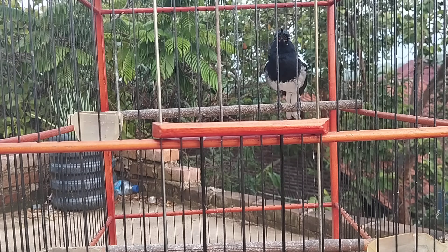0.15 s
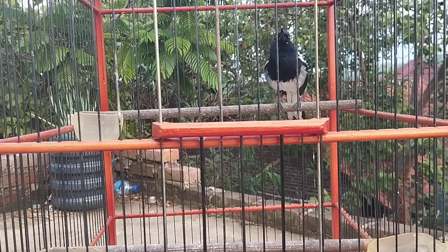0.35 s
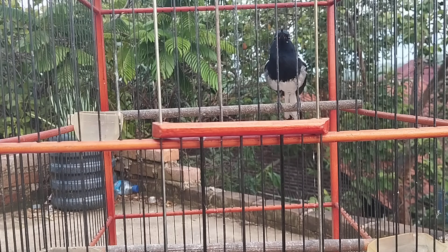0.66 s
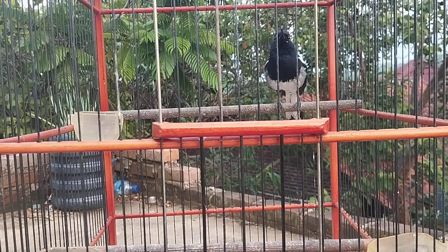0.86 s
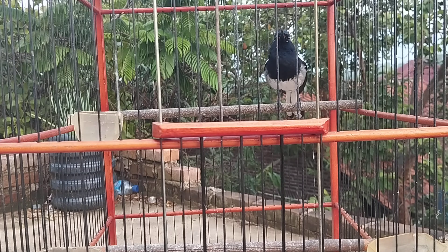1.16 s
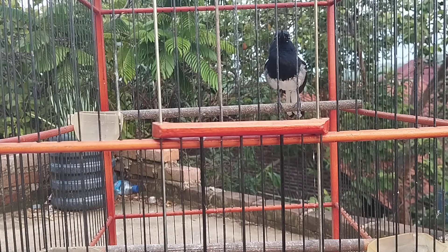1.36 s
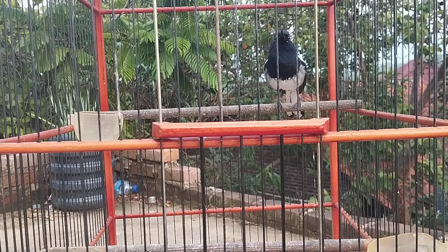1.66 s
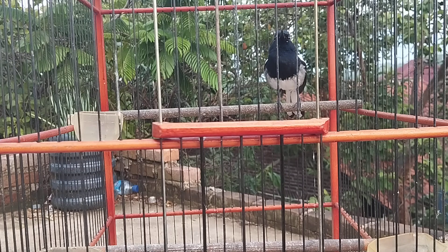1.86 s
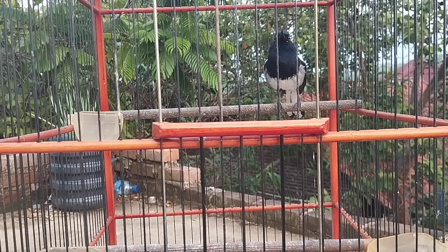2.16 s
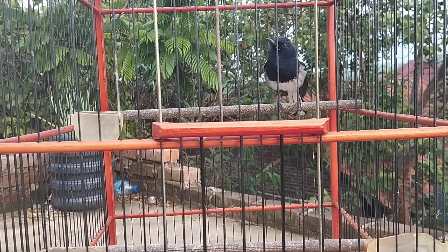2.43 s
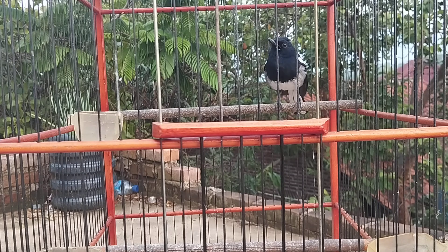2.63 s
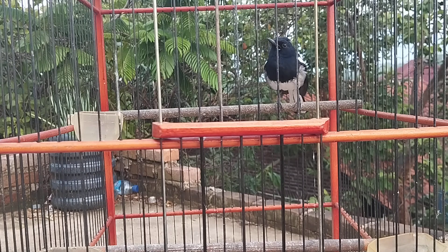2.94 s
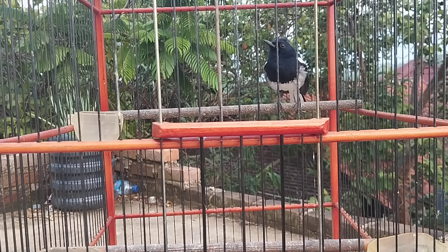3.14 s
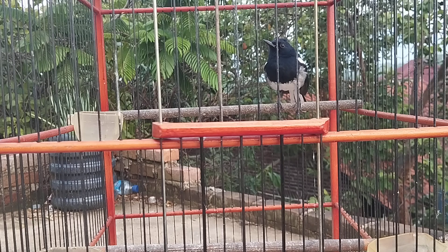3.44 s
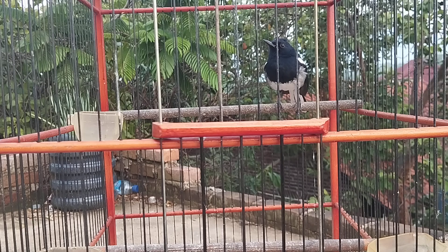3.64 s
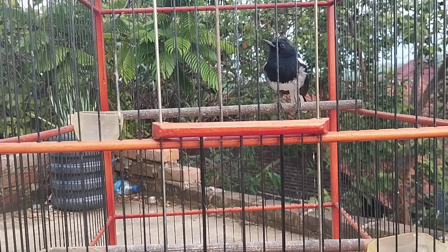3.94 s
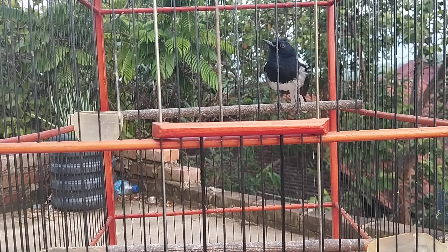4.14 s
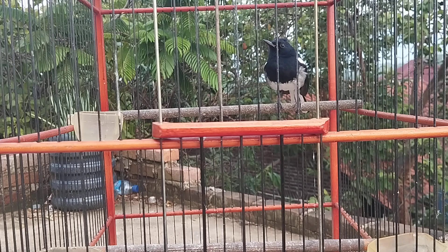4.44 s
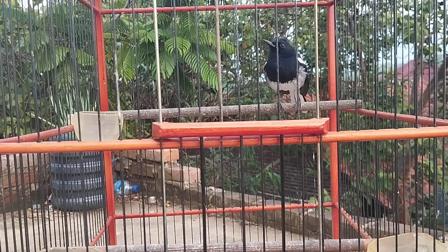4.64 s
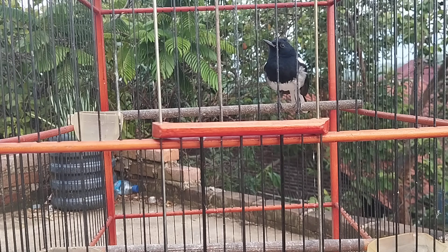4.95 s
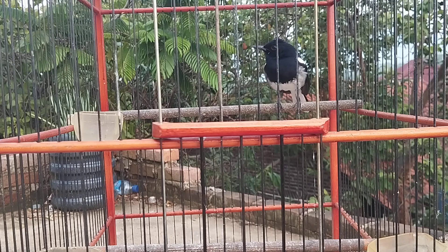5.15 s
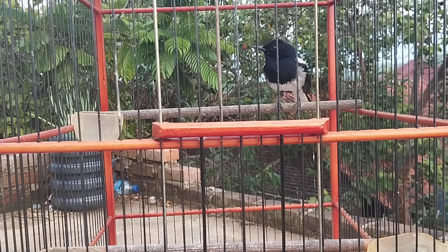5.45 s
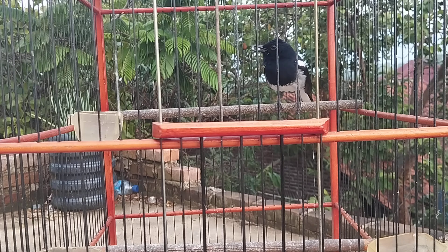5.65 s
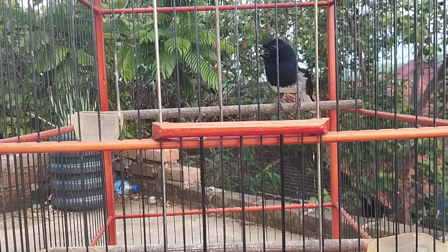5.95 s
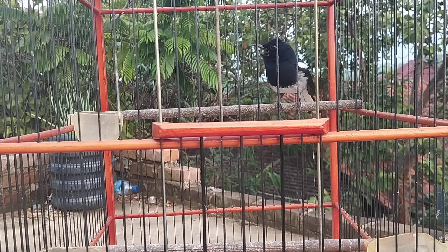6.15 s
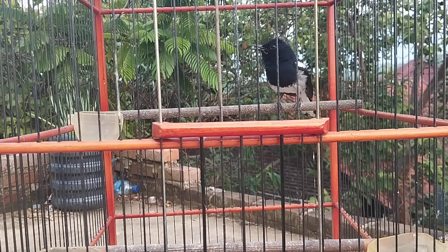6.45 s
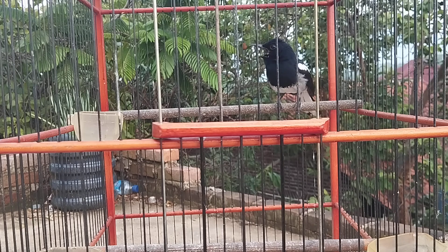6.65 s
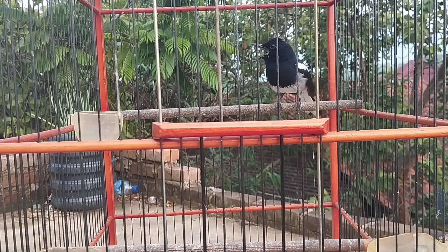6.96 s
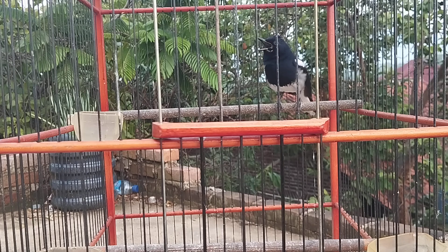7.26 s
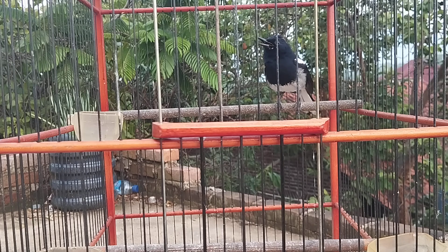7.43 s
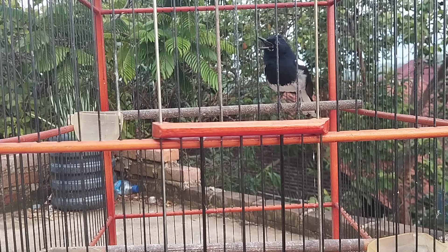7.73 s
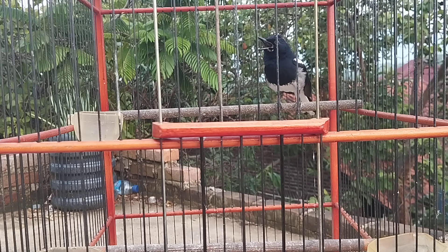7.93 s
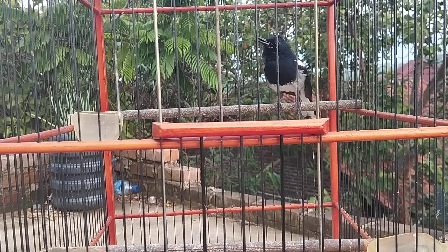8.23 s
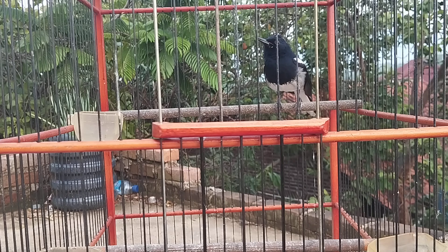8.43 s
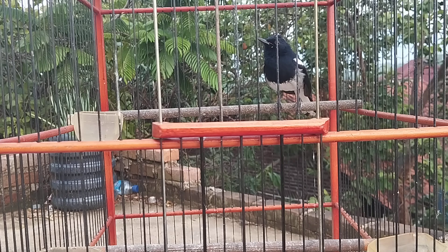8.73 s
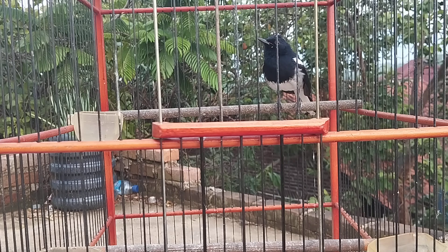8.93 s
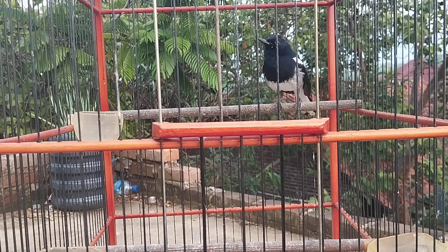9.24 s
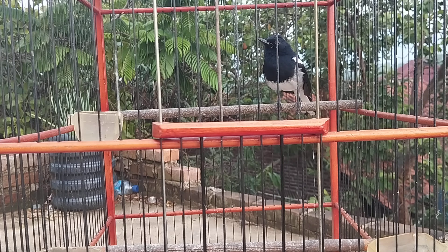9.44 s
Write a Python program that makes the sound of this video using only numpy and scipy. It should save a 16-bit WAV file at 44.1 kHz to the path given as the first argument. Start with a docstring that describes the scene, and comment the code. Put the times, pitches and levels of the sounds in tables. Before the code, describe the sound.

A caged songbird sings close to a stereo microphone in a yard, opening with quick, loud whistles, a trill and a buzzy note. It pauses for several seconds, leaving faint chirps from other birds, a few small ticks and low traffic rumble. Then it sings a longer phrase of sliding notes and clear whistles, again ending in a trill and buzz. Faint insects and a very distant siren lie underneath.

```python
"""Caged songbird in a yard

Two bouts of whistles, trills, slurs and two-voiced buzzes from the membranes of the syrinx, close to
a stereo microphone. Nearby walls throw quick echoes. Behind: other birds, small ticks, insects,
traffic rumble, an idling engine and a very distant two-tone siren."""
import sys
import numpy as np
from scipy import signal
from scipy.io import wavfile
from scipy.ndimage import uniform_filter1d, minimum_filter1d

SR = 44100
rng = np.random.default_rng(int(sys.argv[2]) if len(sys.argv) > 2 else 0)


def dump_mix(stems):
    """Bounce the given channels to the path in sys.argv[1] as a 16-bit WAV at rate SR."""
    frames = np.atleast_2d(stems).T  # one column per channel
    limited = np.clip(frames, -1, 1)  # hard clip at full scale
    pcm = np.round(limited * 32767).astype(np.int16)
    wavfile.write(sys.argv[1], SR, pcm)


N = 422919

# rumble and hiss: (frequency [Hz], relative density [dB])
AIR_SPECTRUM = [(15, -33), (25, -7), (55, 2), (100, -9), (190, -2.5), (300, -9.5), (520, -20), (800, -21.5),
                (1000, -27.5), (2000, -30), (4500, -30), (8300, -38), (9300, -67.5), (16000, -64.5)]
# (frequency [Hz], left-right correlation [-1..1])
AIR_CORRELATION = [(60, 0.97), (180, 0.87), (550, -0.54), (1650, 0.13), (4970, 0.97), (15000, 0.73)]
# (time [s], relative level [dB])
TRAFFIC_SWELL = [(0, -58.5), (2.1, -53.5), (5.301, -54), (7.1, -57), (7.9, -54.5), (8.499, -51),
                 (9.59, -52)]
# (centre [Hz], spread [Hz], level [dB])
INSECT_BANDS = [(2382, 130, -65.5), (7350, 500, -77)]
# (time [s], firing rate [Hz], gain [dB])
ENGINE_CURVE = [(3, 36.2, -65.5), (7.6, 37.7, -58.5), (9.59, 38.4, -57)]
# low and high tone: (pitch [Hz], initial level [dB], first onset [s])
SIREN_TONES = [(582, -65, .58), (762, -69, -.1)]
# short taps and ticks; the first is a faint puff of background hiss:
# (time [s], initial level [dB], resonance [Hz], bandwidth [Hz])
TICKS = [(.154, -50, 4200, 3000), (0.7, -45, 700, 870), (1.262, -48.5, 4470, 3970),
         (1.872, -47, 4500, 4010), (1.978, -37.5, 980, 1190), (1.98, -64, 4000, 3920),
         (2.508, -52, 4000, 4000), (3.837, -53, 5920, 2980), (5.216, -55.5, 6460, 3056)]

# far songbirds: (time [s], length [s], first [Hz], middle [Hz], last [Hz], level [dB])
FAR_CALLS = [(1.22, .11, 1763, 1827, 1835, -48.5), (1.373, 0.14, 1343, 1390, 1460, -49.5),
             (1.602, .13, 1663, 1762, 1876, -49), (1.759, 0.11, 1235, 1372, 1345, -48.5),
             (1.974, 0.098, 3035, 2881, 2940, -43.5), (2.056, 0.083, 2990, 2317, 1980, -45),
             (2.201, .14, 1200, 1338, 1387, -50.5), (2.4, 0.082, 1128, 1694, 1730, -49.5),
             (2.5, 0.091, 1190, 1684, 1840, -49), (2.602, 0.21, 1804, 2195, 2516, -46),
             (2.917, .036, 2280, 1510, 1080, -48), (2.97, .11, 1732, 1765, 1861, -47.5),
             (3.298, 0.05, 4657, 4680, 4654, -66), (1.017, 0.17, 4020, 3896, 3900, -59.5),
             (4.235, 0.088, 2570, 3940, 5050, -56.5), (4.31, 0.11, 4570, 6300, 6880, -54.5),
             (3.835, 0.042, 2910, 3400, 4080, -55), (8.51, 0.06, 4100, 3990, 3680, -70),
             (5.692, .15, 1403, 1385, 1380, -69.5), (9.214, .15, 1060, 1102, 1058, -71.5)]
# small near bird: columns as FAR_CALLS
NEAR_CALLS = [(2.815, 0.034, 4400, 3634, 4300, -66), (2.865, .035, 4600, 3900, 4500, -60),
              (5.48, .18, 5100, 4490, 3750, -71), (9.175, 0.16, 4780, 4284, 3450, -58.5)]
# steeply falling chirps: (time [s], length [s], first pitch [Hz], level [dB])
CHIRPS = [(3.39, .05, 4300, -64), (3.471, 0.045, 4290, -59), (3.619, 0.044, 4390, -54),
          (3.757, 0.052, 4200, -55), (3.865, 0.058, 4900, -51.5), (4.026, 0.053, 4200, -53.5),
          (4.531, 0.045, 4430, -54), (4.707, 0.043, 4320, -51.5), (4.877, .048, 4390, -55.5),
          (8.818, 0.035, 5800, -56), (8.984, .026, 6300, -55), (9.377, 0.024, 5500, -53)]
# one far whistle, repeated: (time [s], length [s], level [dB])
FALLS = [(.097, .11, -52), (.32, .17, -49), (.587, .19, -50.5)]
FALL_HZ = (5880, 4270, 3870)  # first, middle, last

# plain notes: (time [s], length [s], peak [dB], peak position [0..1], sag [dB], entry [Hz],
# after attack [Hz], at peak [Hz], before release [Hz], exit [Hz], roughness [0..1],
# brightness [dB], left minus right [dB])
WHISTLES = [(-.1, 0.16, -2.5, 0.95, 0.5, 3230, 3258, 3390, 3355, 3250, 0.4, -19.5, -2.5),
            (0.195, 0.14, -2.5, 0.26, 6.6, 3607, 3240, 3219, 3149, 3180, 0.26, -5, 6.5),
            (5.998, 0.13, -7, 0.42, 0.33, 3470, 3687, 3734, 3672, 3786, 0.17, 5.5, -0.5),
            (6.996, 0.11, -8.5, .5, 3.3, 4740, 4574, 4499, 4562, 4805, 0.38, -6.5, -3),
            (7.236, 0.15, 0, .55, 0.46, 3380, 3134, 3378, 3392, 3260, 0.4, -7.5, 1),
            (7.532, 0.14, 2, 0.79, 8.7, 3470, 3222, 3201, 3135, 3167, 0.22, -6.5, 1.5)]
# (time [s], length [s], level [dB], opening [Hz], first [Hz], last [Hz], left minus right [dB])
TRILLS = [(0.434, 0.2913, -9, 3191, 3038, 2822, 2.5), (7.77, 0.3215, -10, 3178, 3044, 2827, 0.5)]
# brief pitch lifts in the trills: (time [s], lift [Hz])
WARBLES = [(0.48, 49.5), (0.508, 44.4), (0.524, 71), (0.55, 91), (0.58, 108), (.606, 110.6), (0.633, 125),
           (.655, 130), (0.699, 75.7), (7.823, 59.4), (7.841, 39.8), (7.865, 71), (7.885, 70), (7.912, 103),
           (7.935, 88.3), (7.964, 171.5), (7.979, 70), (8.012, 173), (8.068, 116)]
# (time [s], gain [dB], left minus right [dB])
BUZZES = [(.848, -14.5, -0.5), (8.196, -14.5, -0.3)]
# (offset [s], relative level [dB], pitch [Hz], second voice gap [Hz], its strength, roughness [0..1])
BUZZ_CONTOUR = [(0, -12.5, 2081, 212, 0, 0), (0.03, 1.5, 2164, 213, 0.015, .1),
                (.04, 1.5, 2133, 212.3, 0.13, 0.4), (.1, 1, 2128, 201, 0.12, 0.2),
                (.15, 1.5, 2152, 319.3, 0.36, 0.35), (.19, -2.5, 2220, 320, 1.3, .3),
                (.226, -0.5, 2219, 366.5, 1.5, 0.2), (.242, -5, 2137, 354, 0.23, 0.3)]
# one list per slurred note: (time [s], level [dB], pitch [Hz], roughness [0..1])
SLUR_CONTOURS = [
    [(5.716, -43.5, 2310, 0.05), (5.742, -14.5, 2624, 0.19), (5.774, -6.5, 2662, 0.16),
     (5.81, -9.5, 2670, 0.04), (5.834, -5.5, 2607, 0), (5.866, -4.5, 2735, 0.08), (5.886, -14, 2620, 0.3)],
    [(6.243, -22, 3950, 0.08), (6.27, -4, 3897, 0.13), (6.31, -11.5, 3547, 0.8), (6.34, -6.5, 3310, 0.53),
     (6.365, -7.5, 3170, 1), (6.39, -10.5, 2724, 0.46), (6.415, -11, 2647, .69), (6.45, -17.5, 2310, 0.2),
     (6.51, -12, 2164, 0.2), (6.545, -12, 2215, 0.1), (6.565, -15.5, 2490, 0.1)],
    [(6.69, -47.5, 3210, 1), (6.711, -35.5, 3460, 0.98), (6.716, -15.5, 3550, .8), (6.74, -13, 3850, 0.91),
     (6.77, -6.5, 4030, 0.73), (6.795, -16, 3934, 0.14), (6.83, -9.5, 4162, 0), (6.87, -2, 4188, 0.1),
     (6.882, -19, 4310, .07)],
]
# second voice per slur, before scaling by roughness: (gap [Hz], strength, left minus right [dB])
SLUR_VOICES = [(400, 0, 2), (450.5, 0.038, 0.4), (-720, .55, 2)]
# grace notes: (time [s], length [s], first [Hz], last [Hz], final level [dB])
GRACES = [(.175, 0.031, 4900, 5290, -25.5), (7.204, 0.041, 3700, 5360, -29),
          (7.517, .025, 4900, 5220, -30.5), (8.188, .015, 4690, 4850, -43)]
# partials 4 to 7: (level re fundamental before each timbre's offset is added [dB])
UPPER_PARTIALS_DB = [-47, -51, -53.5, -44]
# cage floor and walls: (delay [s], left [dB], right [dB])
ECHOES = [(.004, -19, -15), (.0051, -14.5, -14), (.0061, -25, -15), (.0079, -17, -21), (.0094, -13, -18),
          (0.011, -14, -18), (0.013, -15.5, -9.5), (0.015, -12.5, -10), (0.017, -20, -20.5)]
# songbird's tone colour: throat low cut, microphone dips and peak in the treble:
# (frequency [Hz], gain [dB])
SONG_COLOUR = [(700, -24), (1700, -4.5), (2050, -2.5), (4000, 3), (9000, 1.5), (10000, -22), (12000, -2),
               (13400, -23), (14600, -1.5), (15500, 7.5)]

# timbres: (partial 2 [dB], partial 3 [dB], offset on partials 4 to 7 [dB])
WHISTLE_TONE_DB, TRILL_TONE_DB = (-31, -39.5, -5.5), (-17, -39.5, 6.4)
BUZZ_TONE_DB, SLUR_TONE_DB, GRACE_TONE_DB = (-24, -31, .3), (-28, -35.5, -3.5), (-41, -57, -11.5)
ATTACK_S, RELEASE_S = .011, .012
ONSET_DB, RELEASE_DB = -24, -13  # start re peak; change over a whistle's release


def amp(db):
    return 10 ** (np.asarray(db) / 20)


def unit_rms(x):
    return x / np.sqrt(np.mean(x ** 2) + 1e-20)


def log_interp(points, hz):
    """Spectrum value, linear over log frequency."""
    f, value = np.transpose(points)
    return np.interp(np.log(hz + 1), np.log(f + 1), value)


def add(mix, start_s, sound):
    """Mix in place from start_s."""
    part = mix[..., max(round(start_s * SR), 0):][..., :sound.shape[-1]]
    part += sound[..., :part.shape[-1]]


def wander(samples, cutoff_hz):
    """Low-passed noise, rms 1."""
    lowpass = signal.butter(N=2, Wn=cutoff_hz, fs=SR)
    return unit_rms(signal.lfilter(*lowpass, rng.standard_normal(samples + 2000))[2000:])


def reverb_tail(t60_s, onset_s):
    """Sparse decaying reflections, independent per channel, energy 1."""
    t = np.arange(SR) / SR
    taps = rng.choice([-1., 1.], (2, SR)) * (rng.random((2, SR)) < 3000 / SR)
    taps = taps * amp(-60 * t / t60_s) * (t > onset_s)
    return taps / np.linalg.norm(taps, axis=1, keepdims=True)


def noise_spectra():
    """Bin frequencies and short-time spectra of patchy, partly correlated stereo noise."""
    frames, hz = N // 256 + 5, np.fft.rfftfreq(1024, 1 / SR)
    a, b, c, d, patches = rng.standard_normal((frames, 513, 5)).T
    patches = unit_rms(uniform_filter1d(uniform_filter1d(patches, 10, axis=0), 14, axis=1))
    correlation = np.clip(log_interp(AIR_CORRELATION, hz), -1, 1)[:, None]
    left = a + 1j * b
    right = correlation * left + np.sqrt(1 - correlation ** 2) * (c + 1j * d)
    return hz, np.array([left, right]) * amp(1.3 * patches)


def waveform(spectra):
    """Inverse STFT, rms 1."""
    return unit_rms(signal.istft(spectra, nperseg=1024, noverlap=768)[1][:, :N])


def air(hz, noise, level_db=-49.5):
    """Rumble and hiss; traffic swells the band around 500 Hz."""
    s, db = np.transpose(TRAFFIC_SWELL)
    swell_db = np.interp(np.arange(noise.shape[-1]) * 256 / SR, s, db - db.min())
    band = np.exp(-np.log((hz + 1) / 500) ** 2 / .9)[:, None]
    shape_db = log_interp(AIR_SPECTRUM, hz)[:, None] + band * swell_db
    return amp(level_db) * waveform(noise * amp(shape_db))


def insects(hz, noise):
    """Steady chorus: narrow bands of noise."""
    return sum(amp(db) * waveform(noise * np.exp(-((hz - centre_hz) / spread_hz) ** 2 / 2)[:, None])
               for centre_hz, spread_hz, db in INSECT_BANDS)


def engine():
    """Firing orders of a distant idling motor, each wavering by itself."""
    s, hz, db = np.transpose(ENGINE_CURVE)
    t = np.arange(N) / SR
    cycles = np.cumsum(np.interp(t, s, hz)) / SR
    sway = uniform_filter1d(rng.standard_normal((22, N // 512 + 1)), size=30, axis=1)
    sway = np.repeat(sway, 512, axis=1)[:, :N]
    sway = uniform_filter1d(unit_rms(sway), size=512, axis=1)
    orders = sum(amp(-1.9 * abs(k - 8) + 2.5 * sway[k]) * np.sin(2 * np.pi * k * cycles + k * k)
                 for k in range(3, 22))
    return orders * amp(np.interp(t, s, db))


def siren(period_s=1.358):
    """Two alternating tones, fading with the wind; the high one dies out with distance."""
    t, out = np.arange(N) / SR, 0
    for (hz, db, onset_s), loss_db_per_s in zip(SIREN_TONES, (.1, 1.6)):
        gate = uniform_filter1d(1. * ((t - onset_s) % period_s < period_s / 2), 1500)
        gain = amp(db - loss_db_per_s * t + 2.6 * wander(N, 4.4))
        out = out + np.sqrt(2) * gain * gate * np.sin(2 * np.pi * hz * t)
    return out * amp([[-1.5], [1.5]])


def ticks(t60_s=.089):
    """A faint puff of hiss, then short taps and ticks: noise bursts in one broad resonance each."""
    out, t = np.zeros((2, N)), np.arange(1200) / SR
    for s, db, hz, width_hz in TICKS:
        resonance = signal.iirpeak(hz, hz / width_hz, SR)
        burst = unit_rms(signal.lfilter(*resonance, rng.standard_normal((2, len(t)))))
        add(out, s, amp(db) * burst * amp(-60 * t / t60_s))
    return signal.sosfilt(signal.butter(N=6, Wn=8800, fs=SR, output="sos"), out)


def glides(calls):
    """Bird whistles: sines gliding through three pitches; quick high sweeps are hoarse."""
    dry = np.zeros(N)
    for s, length_s, *hz, db in calls:
        u = np.arange(0, 1, 1 / (SR * length_s))
        high = max(hz) > 3500
        hoarse = high and length_s < .085 and np.ptp(hz) > 750
        pitch_hz = np.polyval(np.polyfit([0, .5, 1], hz, deg=2), u)
        pitch_hz *= 1 + .005 * wander(len(u), 50) + .03 * hoarse * wander(len(u), 200)
        db = db + 4 * high * wander(len(u), 45)  # leaves and air break up high calls
        tone = np.sqrt(2) * np.sin(2 * np.pi * np.cumsum(pitch_hz) / SR)
        add(dry, s, amp(db) * tone * signal.windows.tukey(len(u), .6))
    return dry


def other_birds():
    """Far, chirping and near birds, direct and echoed by trees and houses."""
    falls = [(s, length_s, *FALL_HZ, db) for s, length_s, db in FALLS]
    chirps = [(s, length_s, hz, .75 * hz, .54 * hz, db) for s, length_s, hz, db in CHIRPS]
    dry = np.array([glides(FAR_CALLS + falls), glides(chirps), glides(NEAR_CALLS)])
    direct = amp([-4.5, -6.5, .1]) @ dry
    echoed = amp([3.6, 1.5, -3]) @ dry
    tail = reverb_tail(t60_s=.48, onset_s=.0051)
    return direct + signal.fftconvolve(echoed[None], tail, axes=1)[:, :N]


def syrinx(contour, tone_db, pan_db, warbles=()):
    """A vibrating membrane with weak overtones; a second one pulls on it and adds sidebands."""
    # columns as BUZZ_CONTOUR; missing ones are zero
    s, *columns = np.transpose([tuple(row) + (0,) * (6 - len(row)) for row in contour])
    t = np.arange(s[0], s[-1], 1 / SR)
    db, hz, gap_hz, strength, rough = (np.interp(t, s, c) for c in columns)
    hz = uniform_filter1d(hz, 150, mode="nearest")
    hz += sum(lift_hz * np.exp(-((t - at_s) / width_s) ** 2) for at_s, lift_hz, width_s in warbles)
    hz += 8 * wander(len(t), 90) + 260 * rough ** 3 * wander(len(t), 110)
    gap_hz *= 1 + (.04 + .16 * rough ** 2) * wander(len(t), 80)
    carrier = np.exp(2j * np.pi * np.cumsum(hz) / SR)
    beat = np.exp(2j * np.pi * np.cumsum(gap_hz) / SR)
    # uneven pull within each beat: sideband ladder for a higher second voice, lost in rough notes
    ladder_gain = np.clip(1 - .95 * rough, 0, 1) * (gap_hz > 0)
    ladders = [ladder_gain * sum(ratio ** n * beat ** n * np.exp(-.12j * n * n) for n in range(2, 11))
               for ratio in (.55, .75)]
    leak = wander(len(t), 1100) * (.025 + .05 * rough)  # air between the two voices
    flutter = .5 * rough ** 2 * wander(len(t), 100)
    pull, overtone_pull = (strength * (beat + (ladder + .044 / beat + leak) / (.13 + strength)) + flutter
                           for ladder in ladders)
    second_db, third_db, upper_db = tone_db
    out = carrier * (1 + pull)
    for k, part_db in enumerate([second_db, third_db] + [upper_db + u for u in UPPER_PARTIALS_DB], 2):
        partial = carrier ** k * (1 + .66 * k * overtone_pull) / (1 + .7 * strength ** 2)
        out += amp(part_db) * partial * (k * hz < SR / 2.2)
    edge = np.clip(np.minimum(t - s[0], s[-1] - t) / .0025, 0, 1)
    envelope = np.sqrt(2) * amp(db) * np.sin(edge * np.pi / 2) ** 2
    return envelope * out.real * amp([[pan_db / 2], [-pan_db / 2]])


def grace(s, length_s, first_hz, last_hz, db, start_db=-22.5):
    """Thin rising note that swells into the next."""
    contour = [(s, db + start_db, first_hz),
               (s + .5 * length_s, db + .68 * start_db, .32 * first_hz + .68 * last_hz),
               (s + length_s, db, last_hz)]
    return contour, GRACE_TONE_DB, 0


def slur(points, gap_hz, strength, pan_db):
    """Sliding note; any second voice grows with hoarseness."""
    contour = [(s, db, hz, gap_hz * (.39 + .65 * rough), strength * rough ** 3, rough)
               for s, db, hz, rough in points]
    return contour, SLUR_TONE_DB, pan_db


def buzz(s, gain_db, pan_db):
    """Both sides of the syrinx sound and beat."""
    contour = [(s + offset_s, gain_db + db, *rest) for offset_s, db, *rest in BUZZ_CONTOUR]
    return contour, BUZZ_TONE_DB, pan_db


def trill(s, length_s, db, opening_hz, first_hz, last_hz, pan_db, opening_s=.022, step_s=.008, sag_db=5):
    """A plain opening steps down to a sinking note with lengthening warbles."""
    contour = [(s, db + ONSET_DB, first_hz),
               (s + 1.6 * ATTACK_S, db, opening_hz),
               (s + opening_s, db, opening_hz),
               (s + opening_s + step_s, db, first_hz),
               (s + .5 * length_s, db - .27 * sag_db, .67 * first_hz + .33 * last_hz),
               (s + length_s - RELEASE_S, db - sag_db, last_hz),
               (s + length_s, db - sag_db + RELEASE_DB / 2, last_hz)]
    warbles = [(at_s, lift_hz, .004 + .018 * (at_s - s))
               for at_s, lift_hz in WARBLES if s < at_s < s + length_s]
    return contour, TRILL_TONE_DB, pan_db, warbles


def whistle(s, length_s, db, peak_at, sag_db, entry_hz, first_hz, peak_hz, last_hz, exit_hz,
            rough, bright_db, pan_db):
    """Opens quickly with some grit, swells, sags and closes with a flick."""
    contour = [(s, db + ONSET_DB, entry_hz, 0, 0, .87 * rough),
               (s + ATTACK_S, db - 9.5, first_hz, 0, 0, rough),
               (s + peak_at * length_s, db, peak_hz, 0, 0, rough),
               (s + length_s - RELEASE_S, db - sag_db, last_hz, 0, 0, rough),
               (s + length_s, db - sag_db + RELEASE_DB, exit_hz, 0, 0, rough)]
    return contour, np.add(WHISTLE_TONE_DB, (0, bright_db, bright_db / 2)), pan_db


def songbird(lead_s=.2):
    """The song, under way before time zero, with close echoes and the yard's tail."""
    notes = [whistle(*row) for row in WHISTLES] + [trill(*row) for row in TRILLS]
    notes += [buzz(*row) for row in BUZZES]
    notes += [slur(points, *voice) for points, voice in zip(SLUR_CONTOURS, SLUR_VOICES)]
    notes += [grace(*row) for row in GRACES]
    dry = np.zeros((2, N + round(lead_s * SR)))
    for contour, *voicing in notes:
        add(dry, lead_s + contour[0][0], syrinx(contour, *voicing))
    out = np.array([dry[0], np.roll(dry[1], 1)])  # reaches the left port first
    for delay_s, left_db, right_db in ECHOES:
        add(out[0], delay_s, amp(left_db) * dry[0])
        add(out[1], delay_s + .0001, amp(right_db) * dry[1])
    yard = amp(-16.5) * reverb_tail(t60_s=.13, onset_s=.005)
    yard += amp(-38.5) * reverb_tail(t60_s=.91, onset_s=.027)
    out += signal.fftconvolve(dry.mean(0)[None], yard, axes=1)[:, :out.shape[1]]
    return out[:, -N:]


def scene():
    """All sources at the two microphone ports."""
    hz = np.linspace(0, SR / 2, 129)
    colour_fir = signal.firwin2(255, hz, amp(log_interp(SONG_COLOUR, hz)), fs=SR)
    bird = signal.oaconvolve(songbird(), colour_fir[None], "same")
    events = bird + other_birds() + ticks()
    bins_hz, noise = noise_spectra()
    return events + air(bins_hz, noise) + insects(bins_hz, noise) + engine() + siren()


def record(dry):
    """Gentle gain control ducks the mix on loud notes; then peak limiter and band limit."""
    threshold_db, recovery_db_per_s, ceiling, cutoff_hz = -13, 119, .96, 16050
    power_db = 10 * np.log10(abs(uniform_filter1d((dry ** 2).mean(0), 800)) + 1e-12)
    ramp_db = np.arange(N) * recovery_db_per_s / SR
    held_db = np.maximum.accumulate(power_db + ramp_db) - ramp_db
    over_db = np.maximum(held_db - threshold_db, 0)
    ducked = dry / amp(.3 * uniform_filter1d(over_db, 800))
    limit_gain = minimum_filter1d(np.minimum(1, ceiling / (abs(ducked).max(0) + 1e-9)), size=401)
    limited = ducked * uniform_filter1d(limit_gain, size=201)
    lowpass = signal.firwin(511, cutoff_hz, window=("kaiser", 9), fs=SR)
    return signal.oaconvolve(limited, lowpass[None], "same")


dry = scene()
out = record(dry)
dump_mix(out)
```